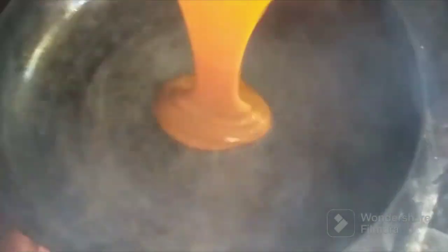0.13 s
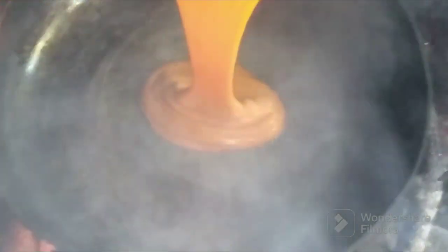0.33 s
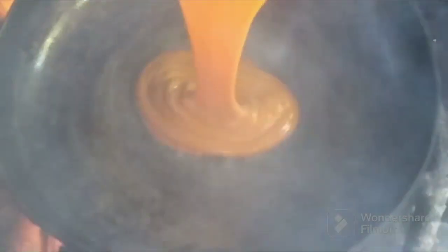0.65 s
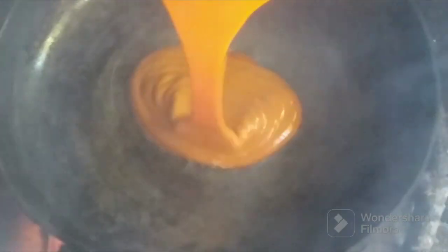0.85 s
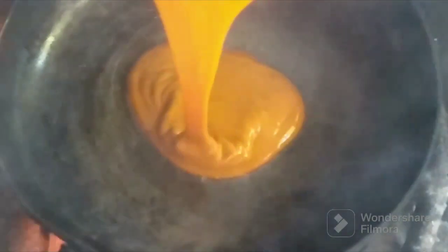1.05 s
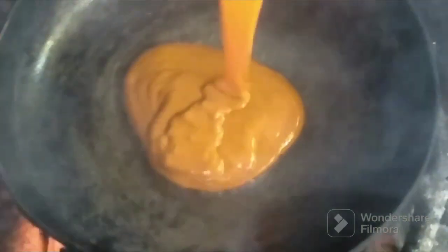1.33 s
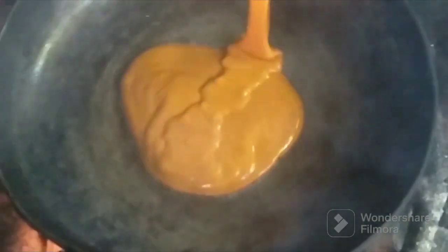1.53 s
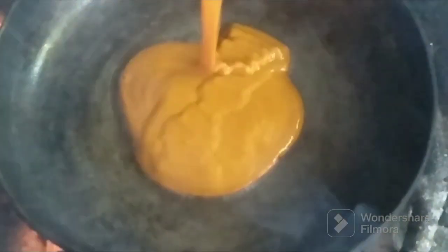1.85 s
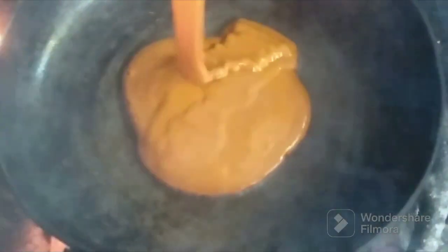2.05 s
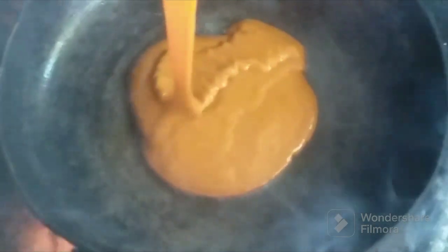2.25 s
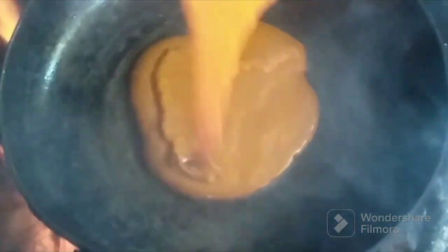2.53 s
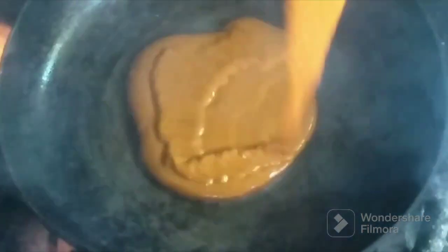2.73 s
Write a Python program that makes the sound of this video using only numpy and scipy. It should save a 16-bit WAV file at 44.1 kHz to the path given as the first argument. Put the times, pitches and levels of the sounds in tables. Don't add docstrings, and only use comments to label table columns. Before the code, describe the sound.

Sizzling batter in a hot metal pan, heard close in a quiet kitchen. It starts very faint over low air rumble, rises within the first half second, and a short hard jug knock lands near 0.24 s. From about 1 s the fizz is full and brighter, with sharp spits thickest from 1.7 to 2.4 s. Brief dips near 2.25 and 2.6 s leave it fluttering and slightly softer until 3 s.

```python
import sys
import numpy as np
from scipy import signal
from scipy.io import wavfile
from scipy.ndimage import uniform_filter1d

SR = 44100
rng = np.random.default_rng(int(sys.argv[2]) if len(sys.argv) > 2 else 0)


def unload_wav(signal):
    wavfile.write(
        sys.argv[1],
        SR,
        np.round(np.clip(np.atleast_2d(signal).T, -1, 1) * 32767).astype(np.int16),
    )


def to_linear_factor(level_db):
    exponent = np.asarray(level_db, float) / 20
    return 10 ** exponent


N = 127890
T = np.arange(N) / SR


def evened(x):
    return x / np.sqrt(np.mean(x ** 2) + 1e-20)


def colour(x, points, below_db=0):
    f, db = np.transpose(points)
    hz = abs(np.fft.fftfreq(4096, 1 / SR)) + 1
    octaves_under = np.clip(np.log2(f[0] / hz), 0, 4)
    gain_db = np.interp(np.log(hz), np.log(f), db) - abs(below_db) * octaves_under
    log_gain = np.log(to_linear_factor(gain_db))
    taps = np.fft.ifft(np.exp(np.conj(signal.hilbert(log_gain)))).real
    return signal.oaconvolve(x, taps)[:N]


def resonate(x, hz, width_hz):
    r = np.exp(-np.pi * width_hz / SR)
    for _ in range(2):
        x = signal.lfilter([1, 0, -r], [1, -2 * r * np.cos(2 * np.pi * hz / SR), r * r], x)
    return evened(x)


def wander(seconds):
    a = np.exp(-1 / (seconds * SR))
    x = signal.lfilter([1], [1, -2 * a, a * a], rng.standard_normal(N + SR))[SR:]
    return evened(x - uniform_filter1d(x, size=6000))


def bursts(per_s, spread_db, hiss, biggest=3.3):
    chance = rng.random(N)
    size = np.minimum(rng.exponential(1, N), biggest)
    sign_noise, hiss_noise = rng.standard_normal((2, N))
    clicks = (chance < per_s / SR) * to_linear_factor(spread_db * size) * np.sign(sign_noise)
    return np.sqrt(1 - hiss) * evened(clicks) + np.sqrt(hiss) * hiss_noise


def patchy(x, db, tilt_db):
    hz, t, z = signal.stft(x, SR, nperseg=256)
    patches = uniform_filter1d(rng.standard_normal(z.shape), size=8, axis=0)
    patches = uniform_filter1d(patches, size=8, axis=1)
    top = np.clip(np.log2(hz / 9000 + 1e-9) * 2.0, 0, 1)[:, None]
    gain_db = db * evened(patches) + top * np.interp(t, T, tilt_db)
    return signal.istft(z * to_linear_factor(gain_db), nperseg=256)[1][:N]


# t/s, level/dB
BOIL_STRENGTH = [(0, -39), (.03, -39), (.14, -34.5), (.3, -32.5), (.55, -31), (.8, -30), (1.0, -29),
                 (1.19, -30.5), (1.35, -29), (1.55, -29.5), (1.7, -29), (1.95, -28.5), (2.15, -28.5),
                 (2.3, -30.5), (2.42, -28), (2.54, -33), (2.72, -30.5), (2.9, -32)]


def boil_level():
    return np.interp(T, *np.transpose(BOIL_STRENGTH))


# f/Hz, level/dB per Hz
ROOM_AIR = [(12, -76), (20, 0.5), (85, -9), (156, -6), (248, -13.5), (300, -10), (515, -8.5), (676, -17),
            (900, -14), (1170, -28), (1980, -120)]
ROOM_DB, ROAR_FOLLOW = -57, 0.45
DRAUGHT_DB, DRAUGHT_S = 10, 0.56
HUM_HZ, HUM_WIDTH_HZ, HUM_DB = 155, 16, -69


def kitchen():
    air = to_linear_factor(ROOM_DB) * evened(colour(rng.standard_normal(N), ROOM_AIR))
    low = signal.sosfiltfilt(signal.butter(2, 110, fs=SR, output="sos"), air)
    roar = (air - low) * to_linear_factor(ROAR_FOLLOW * (boil_level() + 25.5))
    draught = low * to_linear_factor(DRAUGHT_DB * np.exp(-T / DRAUGHT_S))
    hum = to_linear_factor(HUM_DB) * resonate(rng.standard_normal(N), HUM_HZ, HUM_WIDTH_HZ)
    return draught + roar + hum


# t/s, peak level/dB, dullness (below 0 bright, above 0 dull)
JUG_HITS = [
    (.2419, -10.5, -1.17),
    (.2428, -23, 0.19),
    (0.2441, -12, 0.16),
    (0.2476, -23.5, 0.95),
]
# f/Hz, level/dB, t60/s
JUG_MODES = [(168.5, -14.5, 0.09), (330, -18.5, 0.043), (547, 7, 0.012), (695, -12, 0.0094),
             (920, -2, 0.011), (1110, 10.5, 0.011), (1470, -0.5, 0.017), (1800, -11, 0.0065),
             (2220, -7.5, 0.018), (2700, -3, 0.025), (3200, -21, 0.014), (3700, -1.5, 0.014),
             (4510, -3.5, 0.0075), (5270, -12, 0.0026)]
KNOCK_RISE_S = .00015


def knock():
    out = np.zeros(N)
    for s, db, dull in JUG_HITS:
        t = np.maximum(T[:SR // 2] - s, 0)
        ring = 0
        for hz, mode_db, t60 in JUG_MODES:
            level_db = mode_db - 6.6 * dull * np.log2(hz / 1500) - 60 * t / t60
            ring = ring + to_linear_factor(level_db) * np.sin(2 * np.pi * hz * t)
        out[:SR // 2] += to_linear_factor(db - 15.0) * (1 - np.exp(-t / KNOCK_RISE_S)) * ring
    return signal.sosfilt(signal.butter(2, 120, "high", fs=SR, output="sos"), out)


# t/s, peak level/dB, f/Hz
DROPLETS = [(0.3688, -13, 7900), (0.5356, -18, 7950), (0.671, -14, 8960), (0.7488, -22, 7740),
            (0.935, -9, 13600), (0.951, -8.5, 8700), (1.0478, -19, 7600), (1.085, -7, 8800),
            (1.2821, -14, 8800), (1.3933, -7.5, 9100), (1.474, -17, 8540), (1.676, -4, 8700),
            (1.7386, -9.5, 8950), (1.7785, -10, 8300), (1.815, -10.5, 8200), (1.8743, -9, 8400),
            (1.9484, -8, 9500), (1.979, -10, 9200), (2.0152, -11, 9200), (2.222, -2.5, 14600),
            (2.2489, -8, 13600), (2.2699, -16, 8400), (2.3347, -14, 12300), (2.3731, -10, 15400),
            (2.3996, -10, 14600), (2.5072, -11, 8240), (2.5702, -14, 14600), (2.6645, -18, 8900),
            (2.7528, -17, 8560), (2.8188, -12, 8700)]
SPIT_LATE_S, SPIT_DB, SPIT_TOP_DB, SPIT_WIDTH_HZ = .001, -4, -11, 2900
SPIT_SPRAY_S, SPIT_SPRAY_DB = 0.005, -17.5


def spits():
    out, t = np.zeros(N + 1000), np.arange(800) / SR
    for s, db, hz in DROPLETS:
        band_hz = min(hz, 15000)
        crack = resonate(1. * (t == 0), band_hz, SPIT_WIDTH_HZ)
        hiss = resonate(rng.standard_normal(800), band_hz, SPIT_WIDTH_HZ)
        spray = to_linear_factor(SPIT_SPRAY_DB) * hiss * np.exp(-t / SPIT_SPRAY_S)
        level = to_linear_factor(min(db + SPIT_DB, SPIT_TOP_DB))
        out[round((s + SPIT_LATE_S) * SR):][:800] += level * (crack / abs(crack).max() + spray)
    return out[:N]


# collapse t/s, swell level/dB, swell length t/s, dip after level/dB
STEAM_POCKETS = [(0.215, -12, 0.0034, -1), (0.681, 4.5, 0.02, 4), (0.874, 4, 0.011, 1),
                 (1.047, 3, 0.0067, 2), (1.122, 3, .012, 1), (1.288, 6, 0.0069, 4), (1.415, 0, 0.015, 4),
                 (1.536, 0.5, .03, 2.5), (1.804, 0, 0.0058, 2.5), (1.955, 0.5, 0.014, 3),
                 (1.994, 0, .015, 2.5), (2.236, 1, .02, 10), (2.254, 0.5, .01, 0), (2.537, 0.5, .01, 0),
                 (2.594, 3, 0.045, 9), (2.66, -2, 0.014, -0.5), (2.708, 0, 0.019, 5),
                 (2.772, 1.5, 0.012, -1), (2.806, -1.5, 0.012, 9), (2.833, -5, 0.0078, 4),
                 (2.849, -2, 0.0078, 5)]
FLICKER_DB, FLICKER_S, FLUTTER_DB, FLUTTER_S = 0.46, .006, 0.77, .0012
LATE_UNREST, REFILL_S = 0.051, 0.01


def unrest():
    flicker = FLICKER_DB * wander(FLICKER_S) + FLUTTER_DB * wander(FLUTTER_S)
    db = flicker * (1 + LATE_UNREST * T)
    for s, swell_db, length, dip_db in STEAM_POCKETS:
        swell = swell_db * np.exp(-((s - T) / length) ** 2)
        dip = -dip_db * np.exp(-abs(T - s) / REFILL_S)
        db = db + np.where(T < s, swell, dip)
    return uniform_filter1d(db, size=60)


# f/Hz, level/dB per Hz
FIZZ_COLOUR = [(4500, -9.5), (6200, -6.5), (7300, -1.5), (8200, 5.5), (9000, 2), (10300, -0.5), (13000, 0),
               (15450, 0.5)]
# f/Hz, width/Hz
BUBBLE_BANDS = [
    (8300, 1800),
    (11500, 3500),
    (14500, 2500),
]
BURSTS_PER_S, BURST_SPREAD_DB, HISS_SHARE, PATCH_DB = 4000, 3.0, .65, 0.8
TICKS_PER_S, TICK_SPREAD_DB, TICK_DB = 120, 3.0, -14
COVER_S, BRIGHTEN_DB = 1.15, 7.5


def rim_fizz(cover):
    drive = bursts(BURSTS_PER_S, BURST_SPREAD_DB, HISS_SHARE)
    drive = patchy(drive, PATCH_DB, BRIGHTEN_DB * (cover - .7))
    ticks = 0
    for hz, width_hz in BUBBLE_BANDS:
        ticks = ticks + resonate(bursts(TICKS_PER_S, TICK_SPREAD_DB, 0, biggest=1.9), hz, width_hz)
    return evened(colour(drive, FIZZ_COLOUR, below_db=24.5)) + to_linear_factor(TICK_DB) * ticks


# f/Hz, width/Hz, then level/dB when bare, half covered, covered
PAN_HOLLOW = [(860, 190, -55, -29, -53), (1086, 400, -22, -13.5, -15.5), (1815, 604, -16, -11, -15.5),
              (2742, 860, -7.5, -8, -15), (2649, 120, -3, -18.5, -49), (3690, 1430, -11.5, -13, -17.5),
              (4615, 780, -16.5, -13, -22.5), (5520, 700, -19.5, -16, -30.5)]
PAN_BURSTS_PER_S, PAN_SPREAD_DB, PAN_HISS_SHARE, PAN_PATCH_DB = 2500, 1.5, 0.58, 1.29


def pan_ring(cover):
    ring = 0
    for hz, width_hz, *stage_db in PAN_HOLLOW:
        drive = bursts(PAN_BURSTS_PER_S, PAN_SPREAD_DB, PAN_HISS_SHARE)
        ring = ring + to_linear_factor(np.interp(cover, [0, .5, 1], stage_db)) * resonate(drive, hz, width_hz)
    return patchy(ring, PAN_PATCH_DB, 0 * T)


def sizzle():
    boil_db, shake_db = boil_level(), unrest()
    cover = 1 - np.exp(-T / COVER_S)
    pan_db = boil_db - 1.5 + 0.62 * shake_db
    return rim_fizz(cover) * to_linear_factor(boil_db + shake_db) + pan_ring(cover) * to_linear_factor(pan_db)


WET_DB, TAIL_S = -13.5, 0.058


def echoes(x):
    t = np.arange(SR // 4) / SR
    sparse = (rng.random(len(t)) < .06) * (t > .0006)
    taps = np.sign(rng.standard_normal(len(t))) * sparse * to_linear_factor(-60 * t / TAIL_S)
    return signal.fftconvolve(x, taps / np.linalg.norm(taps))[:N]


def scene():
    near = knock() + spits() + sizzle()
    return (kitchen() + near + to_linear_factor(WET_DB) * echoes(near))[None]


def roll_off(x):
    return signal.sosfilt(signal.butter(12, 16660, fs=SR, output="sos"), x)


def record(dry):
    taps = signal.firwin(1023, 15490, window=("kaiser", 10), fs=SR)
    mix = signal.oaconvolve(dry, taps[None], "same")
    return roll_off(mix)


dry = scene()
out = record(dry)
unload_wav(out)
```